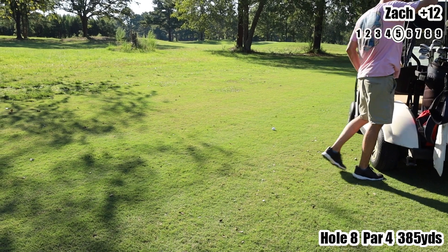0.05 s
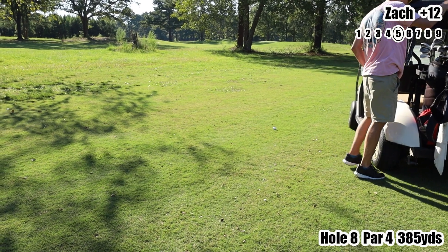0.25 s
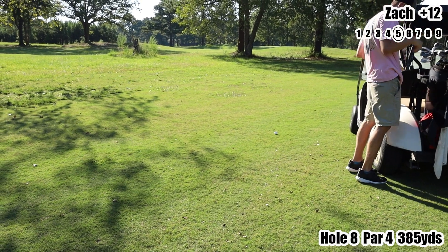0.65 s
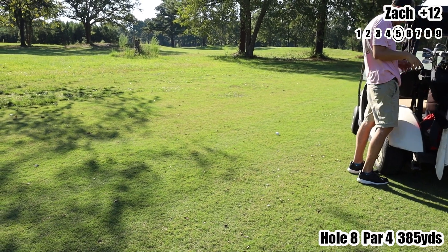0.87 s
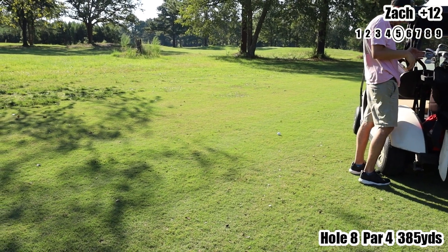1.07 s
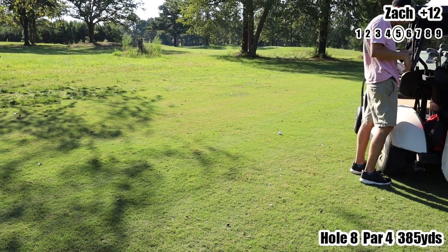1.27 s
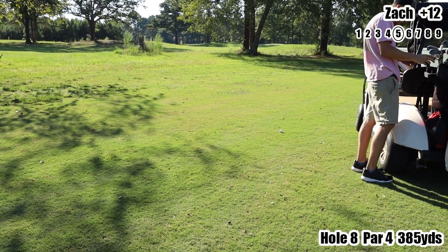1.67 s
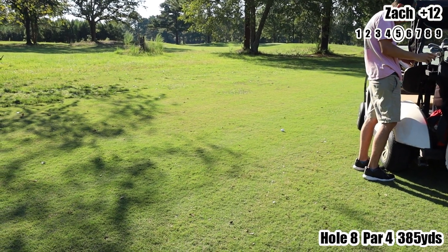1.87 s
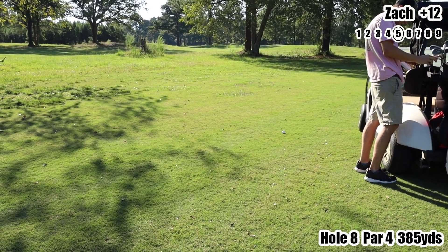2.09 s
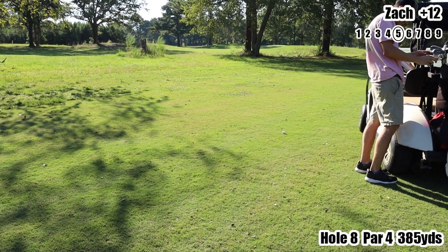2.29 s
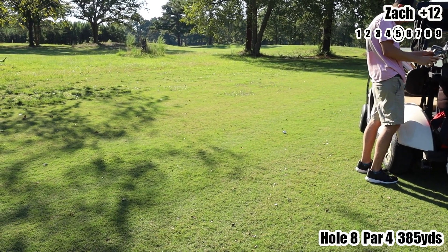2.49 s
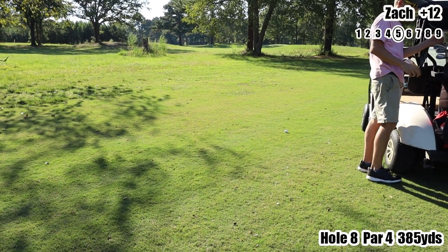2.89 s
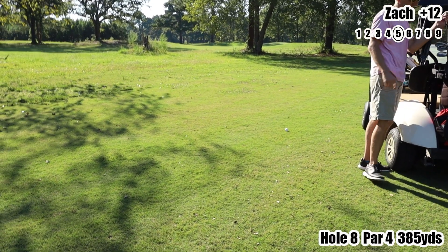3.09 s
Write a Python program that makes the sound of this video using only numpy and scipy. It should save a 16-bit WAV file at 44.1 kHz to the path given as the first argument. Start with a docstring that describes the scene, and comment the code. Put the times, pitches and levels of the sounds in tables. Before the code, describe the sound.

Outdoors on open grass, golf clubs knock together in short bursts, ending with a busier, ringing clatter as one slides from the bag. A breeze puffs on the microphone throughout, over a faint hush of distant trees.

```python
"""Golf clubs click and chatter as they are sorted in a bag on a cart, a few metres to the right of the mic.
Heads and shafts knock together and ring, and one club scrapes along the bag as it is drawn out.
The place is open grass, with only a thin echo. Close up, a breeze rumbles and puffs on the two
microphone ports; far off lies a soft hush of trees and air."""
import sys
import numpy as np
from scipy import signal
from scipy.fft import rfft, irfft, next_fast_len
from scipy.io import wavfile
from scipy.ndimage import uniform_filter1d, minimum_filter1d, map_coordinates

SR = 44100
rng = np.random.default_rng(int(sys.argv[2]) if len(sys.argv) > 2 else 0)


def put_to_file(sound):
    """Save the sound as 16-bit audio at rate SR, in the file named by the first command-line argument."""
    columns = np.atleast_2d(sound).T  # one column per channel
    safe = np.clip(columns, -1, 1)
    whole_steps = np.round(safe * 32767)
    wavfile.write(sys.argv[1], SR, whole_steps.astype(np.int16))


N = 143325

# The hollow body of shafts and bag. Each row: frequency in Hz, relative level in dB.
HOLLOW_SPECTRUM = [(200, 5), (500, -9), (1000, 2), (1500, -1.5), (2200, -0.5), (3200, -5), (6000, 0),
                   (11000, -71)]
HOLLOW_DB = -12
# A loose shaft that rings on. Each row: pitch in Hz, relative level in dB, t60 in seconds.
SHAFT_MODES = [(2655, 0.5, 0.096), (3380, -6, 0.16), (5900, -11, .17)]


def amp(db):
    """Decibels to gain."""
    return 10 ** (np.asarray(db) / 20)


def unit_rms(x):
    """Scale to rms 1."""
    return x / np.sqrt(np.mean(x ** 2) + 1e-20)


def unit_energy(x):
    """Scale to energy 1."""
    return x / np.sqrt(np.sum(x ** 2) + 1e-20)


def along(points, hz):
    """Read (Hz, value) points on a log frequency axis."""
    point_hz, values = np.transpose(points)
    return np.interp(np.log(hz + 1), np.log(point_hz + 1), values)


def curve(points):
    """Join (seconds, value) points into one value per sample."""
    return np.interp(np.arange(N) / SR, *np.transpose(points))


def sides(db):
    """Left and right gains for a left-minus-right level difference."""
    return amp(np.array([[.5], [-.5]]) * db)


def filtered(x, response):
    """Multiply the spectrum of x by response(hz)."""
    n = x.shape[-1]
    size = next_fast_len(2 * n)
    return irfft(rfft(x, size) * response(np.fft.rfftfreq(size, 1 / SR)), size)[..., :n]


def coloured(x, points):
    """Minimum-phase filter of (Hz, dB) shape: nothing sounds ahead of a hit."""
    size = 2048
    cepstrum = irfft(np.log(amp(along(points, np.fft.rfftfreq(size, 1 / SR)))))
    cepstrum[1:size // 2] *= 2
    cepstrum[size // 2 + 1:] = 0
    return signal.fftconvolve(x, irfft(np.exp(rfft(cepstrum))))[:len(x)]


def add(track, start_s, sound):
    """Mix a sound into the track."""
    i = max(round(start_s * SR), 0)
    n = max(min(sound.shape[-1], N - i), 0)
    track[..., i:i + n] += sound[..., :n]


def fade(t, t60):
    """Decay that falls 60 dB in t60 seconds."""
    return np.exp(-np.log(1000) * t / t60)


def stereo_noise(spectrum, alike):
    """Shaped noise of rms 1; alike is the share of power common to both sides."""
    white = rng.standard_normal((3, N))
    pair = np.sqrt(1 - alike) * white[:2] + np.sqrt(alike) * white[2]
    return unit_rms(filtered(pair, lambda hz: amp(along(spectrum, hz))))


def distant_hush():
    """Trees and air far from the microphone, mostly from the open left."""
    # Colour of the hush. Each row: frequency in Hz, relative level in dB.
    spectrum = [(150, -2), (250, -0.5), (302, -6), (600, -8.5), (961, -4), (1700, -16.5), (1850, -17),
                (2710, -19.5), (15500, -28)]
    # Its slow drift. Each row: time in seconds, level in dB.
    levels = [(0, -45.5), (.45, -45.5), (.8, -47.5), (1.1, -46), (1.9, -46), (2.5, -46.5), (3.25, -42)]
    # Its lean to the left. Each row: frequency in Hz, left minus right in dB.
    balance = [(200, 4), (700, 5.5), (1300, 4), (2400, -1), (8000, 0)]
    air = filtered(stereo_noise(spectrum, alike=0.31), lambda hz: sides(along(balance, hz)))
    return amp(curve(levels)) * unit_rms(air)


def wind_on_mic():
    """A breeze rumbles on each port; puffs swing the pressure to and fro and flutter higher up."""
    # Strength of the breeze. Each row: time in seconds, level in dB.
    breeze = [(0, -24), (.14, -35.5), (.25, -24), (.46, -24.5), (.55, -24.5), (.8, -25), (.86, -27),
              (1.1, -25), (1.3, -33), (1.55, -20), (1.85, -29.5), (2.1, -23), (2.3, -24.5), (2.55, -21.5),
              (2.73, -28.5), (3.2, -32.5)]
    # Puffs on the ports. Each row: centre and half-length in seconds, swing rate in Hz,
    # swing level in dB, flutter level in dB, left minus right in dB.
    puffs = [(0.223, 0.0044, 82.5, -8.5, -24, -7), (.245, 0.0075, 54.6, -11.5, -25, 4.5),
             (.316, 0.0045, 70.5, -4.5, -21, 3.5), (0.351, 0.014, 55, -14.5, -19.5, 4),
             (.396, 0.011, 62, -19.5, -27.5, -1), (.432, 0.0051, 70, -16, -29.5, -4.5),
             (0.571, 0.029, 53, -24, -33, -7), (.618, 0.005, 76, -8, -21, -1),
             (0.72, 0.0061, 90, -7.5, -23, -1.5), (0.918, 0.013, 57.5, -11.5, -24, -2.5),
             (0.953, 0.0062, 67, -18, -29.5, 7.5), (1.196, 0.0065, 70, -20, -33.5, -10),
             (1.42, 0.0041, 64.5, -15, -33.5, 0), (1.486, 0.011, 73.3, -16, -30, 0),
             (1.534, 0.011, 49.6, -18.5, -28.5, -7), (1.683, 0.0084, 73, -8.5, -26, 2.5),
             (1.75, 0.0049, 68.6, -17, -30, -7), (2.166, 0.008, 65, -17, -46, 6),
             (2.43, 0.013, 74.3, -20, -44.5, -8), (2.488, 0.004, 70, -15.5, -33.5, 7.5),
             (2.545, 0.0032, 55, -13.5, -47, 8.5), (2.644, 0.0036, 65, -17.5, -35.5, 2.5),
             (2.815, 0.013, 54.6, -17, -35.5, -4)]
    # Colours of the rumble and the flutter. Each row: frequency in Hz, relative level in dB.
    rumble_spectrum = [(10, -12), (25, -7), (45, 0.5), (70, -5.5), (100, -7.5), (140, -16), (200, -29.5),
                       (350, -39), (700, -87), (2000, -120)]
    flutter_spectrum = [(70, -10), (130, 4), (290, 1), (460, -7), (600, -21.5), (1000, -31.5), (2500, -78),
                        (6000, -120)]
    waver_db, waver_per_s, ports_alike = 4, 16, 0.26
    t = np.arange(N) / SR
    knots = rng.standard_normal((2, 256))
    waver = np.array([map_coordinates(port, [t * waver_per_s], mode="wrap") for port in knots])
    rumble = amp(waver_db * waver) * stereo_noise(rumble_spectrum, ports_alike)
    out = amp(curve(breeze)) * unit_rms(rumble)
    flutter = stereo_noise(flutter_spectrum, ports_alike)
    for centre_s, half_s, swing_hz, swing_db, flutter_db, pan_db in puffs:
        swell = np.exp(-.5 * ((t - centre_s) / half_s) ** 2)
        phase = rng.uniform(0, 2 * np.pi) + 0.8 * rng.standard_normal((2, 1))  # differs at each port
        angle = 2 * np.pi * swing_hz * (t - centre_s) + phase
        swing = np.sin(angle) + amp(-11) * np.sin(2 * angle)  # a lopsided swing adds its octave
        for air, db in (swing, swing_db), (flutter, flutter_db):
            puff = np.linalg.norm(swell) * np.array([unit_energy(port * swell) for port in air])
            out += amp(db) * sides(pan_db) * puff
    return out


def with_echo(x):
    """A mono sound plus thin stereo scatter from the cart and trees, new for every sound."""
    # Decay of the scatter. Each row: frequency in Hz, t60 in seconds.
    decay = [(300, .25), (1500, .26), (5000, .17), (9000, .1), (14000, .06)]
    echo_db, build_s = -19, 0.013
    hz, frame_s, bands = signal.stft(rng.standard_normal((2, SR // 2)), SR, nperseg=256)
    tail = signal.istft(bands * fade(frame_s, along(decay, hz)[:, None]), SR, nperseg=256)[1]
    t = np.arange(tail.shape[1]) / SR
    tail *= 1 - np.exp(-(t / build_s) ** 2)
    tail /= np.linalg.norm(tail[0])
    return x + amp(echo_db) * signal.fftconvolve(x[None], tail, axes=1)[:, :len(x)]


def ringing(modes):
    """Free decay of (Hz, dB, t60 seconds) modes after one knock."""
    t = np.arange(SR // 4) / SR
    return sum(amp(db) * fade(t, t60) * np.sin(2 * np.pi * hz * t) for hz, db, t60 in modes)


def shaft_slides():
    """A sliding shaft rubs and makes tiny contacts that sound through clubs and bag and keep it ringing."""
    # Slides along the bag. Each row: start and length in seconds, level in dB, hollow body trim in dB.
    slides = [(0.509, 0.036, -41.5, -9), (0.55, 0.034, -40.5, 14), (2.772, 0.071, -43.5, 17.5),
              (2.86, 0.11, -48, 18.5), (2.946, 0.074, -39, 4), (3.023, 0.094, -48, -2)]
    # Colour of the scrape. Each row: frequency in Hz, relative level in dB.
    scrape_spectrum = [(600, -4), (1500, -12.5), (2500, -1.5), (3600, -6), (5800, 0.5), (7000, -3.5),
                       (8800, -9), (11000, -21), (13500, -40)]
    rise_s, fall_s = 0.0015, 0.022
    taps_per_s, tap_spread_db, rub_db, ring_db = 400, 6.5, -3.5, -12
    out, t = np.zeros((2, N)), np.arange(SR // 2) / SR
    for start_s, length_s, db, trim_db in slides:
        taps = (rng.random(len(t)) < taps_per_s / SR) * amp(tap_spread_db * rng.standard_normal(len(t)))
        friction = unit_rms(unit_rms(taps) + amp(rub_db) * rng.standard_normal(len(t)))
        stroke = (1 - np.exp(-t / rise_s)) * np.exp(-np.maximum(t - length_s, 0) / fall_s)
        scrape = unit_rms(coloured(friction, scrape_spectrum))
        hollow = amp(HOLLOW_DB + trim_db) * unit_rms(coloured(friction, HOLLOW_SPECTRUM))
        ring = signal.fftconvolve(stroke * friction, ringing(SHAFT_MODES))[:len(t)]
        ring = amp(ring_db) * np.linalg.norm(stroke) * unit_energy(ring)
        add(out, start_s, amp(db) * with_echo(stroke * (scrape + hollow) + ring))
    return out


def club_rings():
    """The pitched notes: one head clinks clearly, and a loose shaft rings on after some knocks."""
    # The clinking head. Each row: pitch in Hz, relative level in dB, t60 in seconds.
    head_modes = [(1024, -3.5, 0.071), (2070, 0, 0.05), (4210, 0, 0.034), (6240, 0, 0.068),
                  (8550, 5.5, 0.027), (2810, -16, .22), (5696, -10, 0.21)]
    # Knocks on the loose shaft. Each row: start in seconds, level in dB.
    knocks = [(1.486, -48), (1.516, -54), (1.564, -42.5), (2.954, -35), (3.045, -37.5), (3.094, -43),
              (3.169, -47.5)]
    out = np.zeros((2, N))
    add(out, start_s=.139, sound=amp(-35.5) * with_echo(ringing(head_modes)))
    for start_s, db in knocks:
        add(out, start_s, amp(db) * with_echo(ringing(SHAFT_MODES)))
    return out


def club_body(t, noise, t60):
    """A struck club's hollow knock and the faint ring of its steel head, a little detuned each time."""
    # Lasting ring of the heads. Each row: pitch in Hz, relative level in dB, t60 in seconds.
    steel_modes = [(2085, -1, 0.11), (2530, 11, 0.083), (2630, -1, 0.12), (2710, -22, 0.14),
                   (3100, 1.5, 0.16), (4200, -4, 0.19), (5230, 5, 0.2), (6300, -7, 0.22)]
    steel_db, scatter_db = -24, 2
    hollow = unit_energy(coloured(noise * (fade(t, t60) + fade(t, 2 * t60)), HOLLOW_SPECTRUM))
    mode_hz, mode_db, mode_t60 = np.transpose(steel_modes)
    mode_hz = mode_hz * (1 + 0.012 * rng.uniform(-1.32, 1))
    mode_db = mode_db + scatter_db * rng.standard_normal(len(mode_db))
    steel = unit_energy(ringing(zip(mode_hz, mode_db, mode_t60)))
    return amp(HOLLOW_DB) * hollow + amp(steel_db) * steel


def club_clicks():
    """Clubs knock together: each contact is a clack, a damped resonance, a bright tick and the body."""
    # The contacts. Each row: start in seconds, level in dB, ring pitch in Hz, ring over clack in dB,
    # body trim in dB, t60 of the ring-off in seconds.
    contacts = [(.139, -30, 6400, -1, 11.5, 0.028), (.1712, -38.5, 3700, 0, -7, 0.06),
                (0.193, -45, 3900, 14, 10, 0.013), (0.4564, -27.5, 3720, 0.5, 5.5, 0.051),
                (0.466, -35.5, 6500, 0, -10, 0.05), (0.504, -30, 5600, -25, 15, 0.12),
                (0.5556, -19, 6170, -0.5, -10, 0.021), (0.5664, -17.5, 6230, -1, 2.5, 0.035),
                (0.572, -25.5, 8400, 19, 5, 0.022), (.586, -24.5, 7600, -8, 3, 0.037),
                (0.604, -38, 8000, -10, -3, 0.039), (0.7068, -39.5, 4360, -1, -20, 0.03),
                (0.8315, -38, 6200, 2, 9.5, 0.025), (1.2481, -18, 3400, -10, 2, 0.02),
                (1.2513, -8.5, 5450, 1.5, -10, 0.019), (1.2563, -8, 8400, 2, -6, 0.012),
                (1.2647, -23, 3600, -1, 12, 0.024), (1.291, -33, 5470, -4, 2, 0.014),
                (1.309, -29, 7900, -4, 4, 0.016), (1.342, -27.5, 3470, -4, 6.5, 0.053),
                (1.386, -33, 6040, -5, 1, 0.12), (1.4584, -33, 5740, -2, 9.5, 0.038),
                (1.516, -40.5, 3500, -6, 15, 0.028), (1.563, -28.5, 2630, -7, 11.5, 0.032),
                (1.7466, -33.5, 2500, -1.5, -24, 0.021), (2.6416, -30, 3230, 0, 7.5, 0.019),
                (2.684, -18.5, 4230, -1.5, -10, 0.018), (2.7261, -35.5, 5500, -12, 5, 0.023),
                (2.749, -22, 9300, -8, -6, 0.029), (2.7656, -14, 5530, -3, -5, 0.029),
                (2.8175, -16, 4550, -1.5, 5.5, 0.033), (2.8642, -16, 8300, 4.5, -4, 0.015),
                (2.8797, -37, 7100, 16, 5, 0.015), (2.919, -28, 5330, -8, -2, 0.022),
                (2.9272, -19.5, 5460, 0.5, -9, 0.025), (2.932, -22.5, 5760, -13, 7.5, 0.12),
                (2.954, -11.5, 5800, 5.5, 0, 0.031), (2.9794, -24.5, 5900, -6, -3, 0.033),
                (3.0348, -31.5, 3800, -2, 0, 0.018), (3.095, -24, 3320, -6.5, 5.5, 0.081),
                (3.1668, -37.5, 8700, 2, 12, 0.058), (3.242, -25, 4430, -8, 10, 0.084)]
    # Different parts touch during the rummaging, the hard snap and the drawing of the club;
    # the tick is the bright edge of any contact. Each row: frequency in Hz, relative level in dB.
    rummage_spectrum = [(880, -24), (1500, -25), (1870, -23), (2560, -28), (2720, -18), (3550, 2),
                        (3880, -5), (4240, -2.5), (4870, -15.5), (6120, 0), (6890, -6), (8570, -1),
                        (10300, -12), (11300, -56), (16000, -57)]
    snap_spectrum = [(880, -20.5), (1500, -7), (1690, -12), (2370, -9.5), (3180, -2), (3920, -3.5),
                     (4240, -0.5), (4830, -9), (5540, 2.5), (6830, -5.5), (8490, -2.5), (11000, -15.5),
                     (16000, -33)]
    draw_spectrum = [(880, -24.5), (1500, -9.5), (1620, -4), (1780, -11), (2060, -1.5), (2320, -17),
                     (2510, 1.5), (2740, -10), (3310, -3), (3960, -10.5), (4420, -2.5), (4780, -3),
                     (5830, 1), (6180, 3.5), (6830, -6.5), (8080, 0), (10200, -9.5), (11100, -8),
                     (12500, -56), (13900, -58), (16000, -94)]
    tick_spectrum = [(2000, -20), (12000, -4), (15500, -1)]
    snap_from_s, draw_from_s, ring_width_hz = 1.0, 2.5, 590
    hard_contact_db, hard_tick_db = -10, -23
    bounce_s, bounce_db = .0028, -5.5  # reflection off the ground
    level_window = .003 * SR  # a contact's level is its energy spread over 3 ms
    out, t = np.zeros((2, N)), np.arange(SR // 4) / SR
    push = amp(-7) * (t == 0)  # the clean first impulse, ahead of the dense ring-off
    for start_s, db, ring_hz, ring_db, body_db, t60 in contacts:
        spectrum = (rummage_spectrum if start_s < snap_from_s else
                    snap_spectrum if start_s < draw_from_s else draw_spectrum)
        clack_noise, ring_noise, body_noise = rng.choice([-1, 1], (3, len(t)))
        clack = unit_energy(coloured(push + unit_energy(clack_noise * fade(t, t60)), spectrum))
        resonance = lambda hz: 1j * hz * ring_width_hz / (ring_hz**2 - hz**2 + 1j * hz * ring_width_hz)
        ring = unit_energy(filtered(push + unit_energy(ring_noise * fade(t, t60)), resonance))
        tick = unit_energy(coloured(ring_noise * fade(t, t60=.005), tick_spectrum))
        tick_db = hard_tick_db + 0.44 * (db - hard_contact_db)  # harder contacts are brighter
        body = club_body(t, body_noise, t60)
        hit = unit_energy(clack + amp(ring_db) * ring) + amp(tick_db) * tick + amp(body_db) * body
        delay = round(bounce_s * SR * rng.uniform(0.71, 1.2))
        bounce = amp(bounce_db) * np.pad(hit, (delay, 0))[:len(t)]
        add(out, start_s, amp(db) * np.sqrt(level_window) * with_echo(unit_energy(hit + bounce)))
    return out


def scene():
    """The clubs reach the two ports at different levels and phases; wind and hush surround them."""
    # The clubs' place on the right. Each row: frequency in Hz, left minus right in dB.
    balance = [(300, -9), (1300, -9.5), (2400, -4.5), (4400, -5.5), (8100, 1), (13000, 0.5)]
    # Phase between the ports. Each row: frequency in Hz, lead of the left in radians.
    lead = [(100, 0), (2500, .65), (4500, 1.25), (5600, 1.15), (6750, 1.7), (8100, 1.1), (10500, 1.6),
            (12800, 1.9), (14500, 1.0)]
    ports = lambda hz: sides(along(balance, hz)) * np.exp(np.array([[.5j], [-.5j]]) * along(lead, hz))
    clubs = club_clicks() + club_rings() + shaft_slides()
    return filtered(clubs, ports) + wind_on_mic() + distant_hush()


def record(dry):
    """A fast limiter turns down the peaks, then the top of the treble is cut off."""
    ceiling, window, top_hz = .98, round(.002 * SR), 15900
    needed = ceiling / np.maximum(np.abs(dry), ceiling)
    gain = uniform_filter1d(minimum_filter1d(needed, window, axis=1), window, axis=1)
    return filtered(dry * gain, lambda hz: hz < top_hz)


dry = scene()
out = record(dry)
put_to_file(out)
```